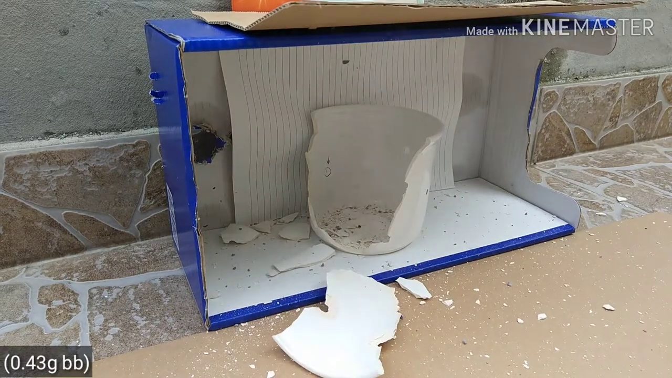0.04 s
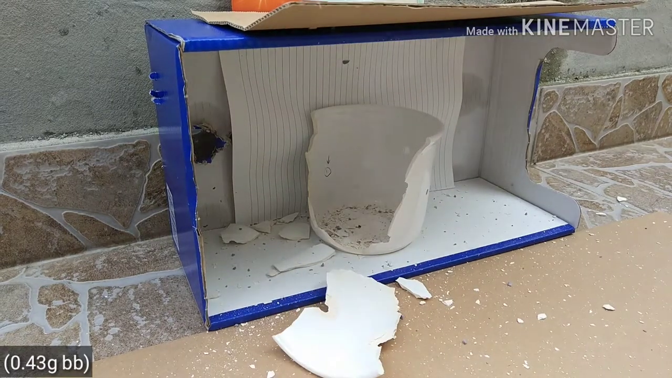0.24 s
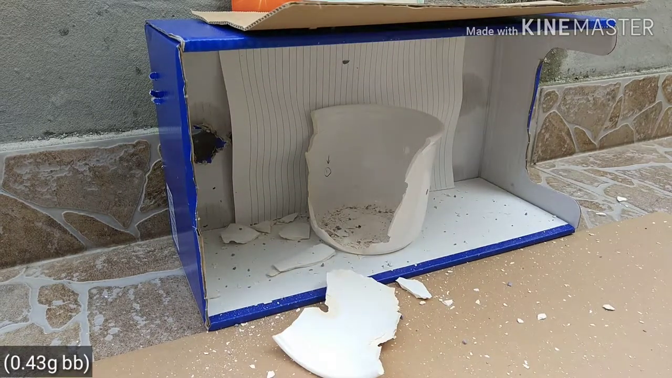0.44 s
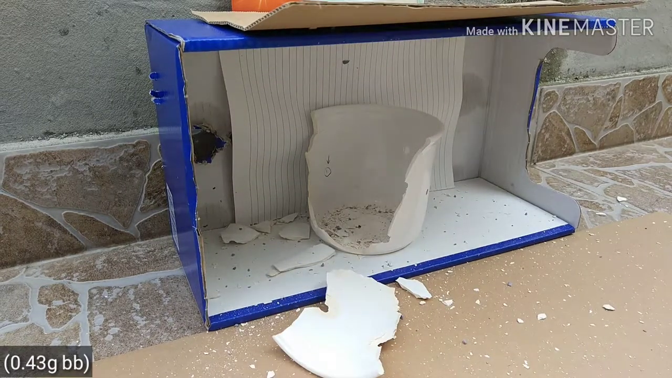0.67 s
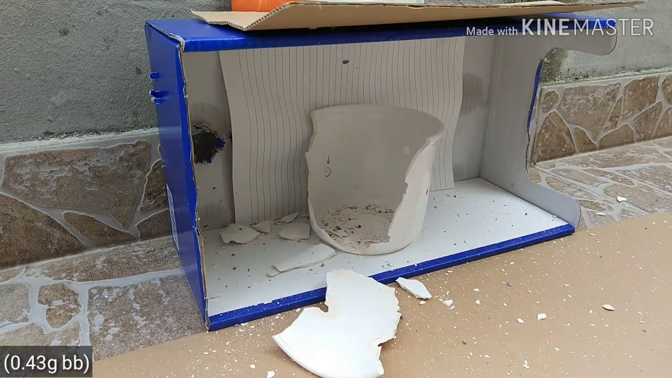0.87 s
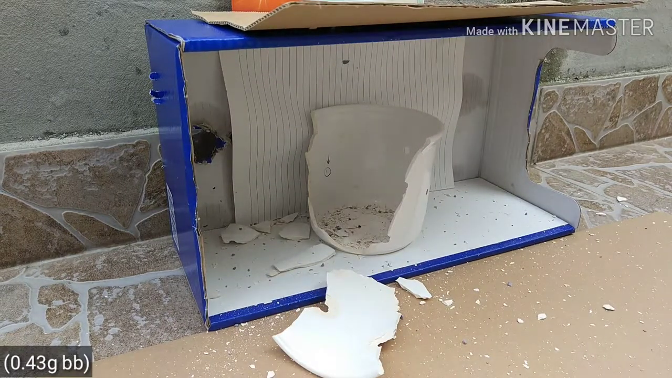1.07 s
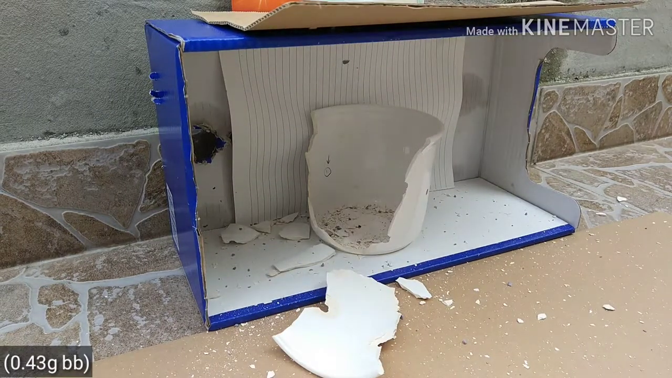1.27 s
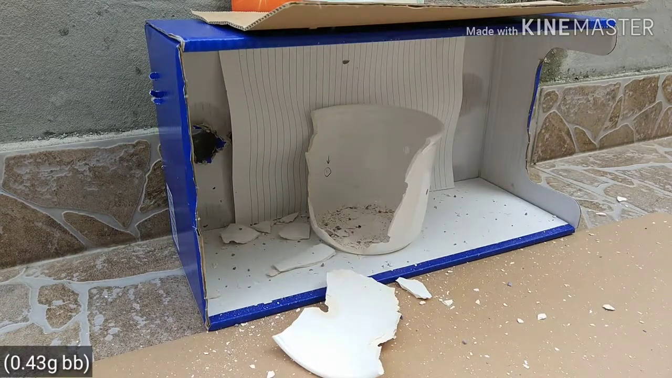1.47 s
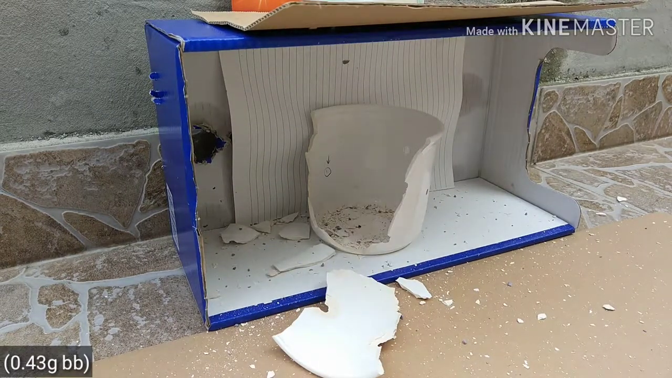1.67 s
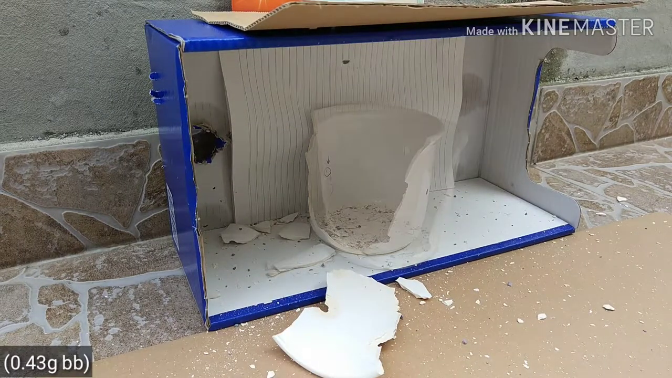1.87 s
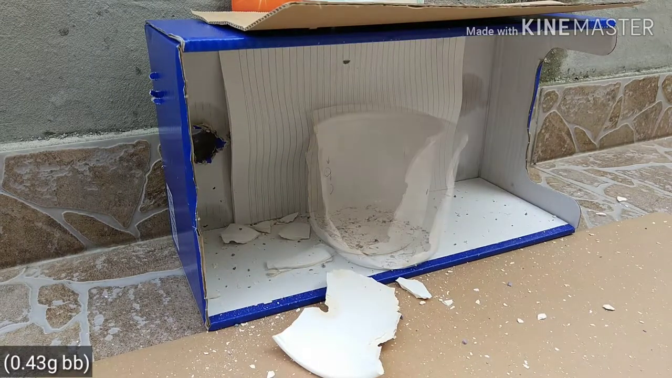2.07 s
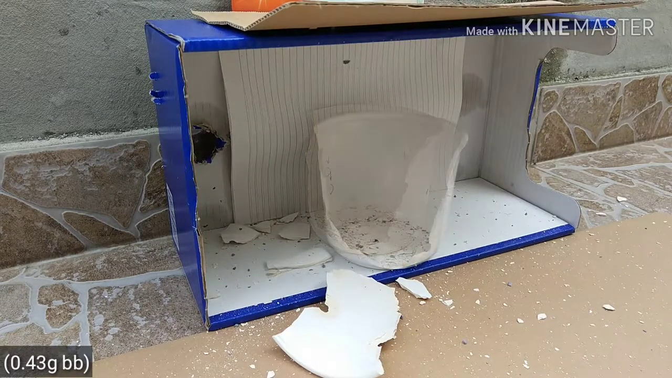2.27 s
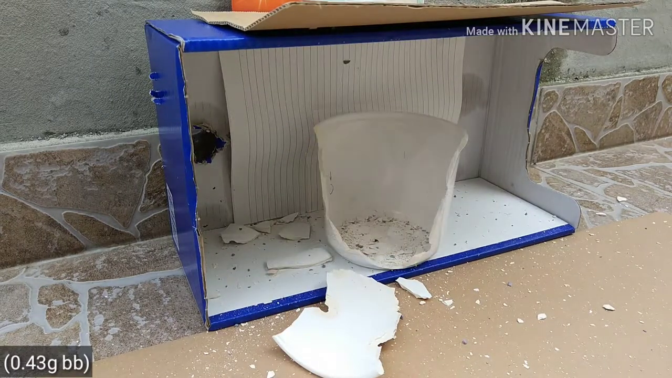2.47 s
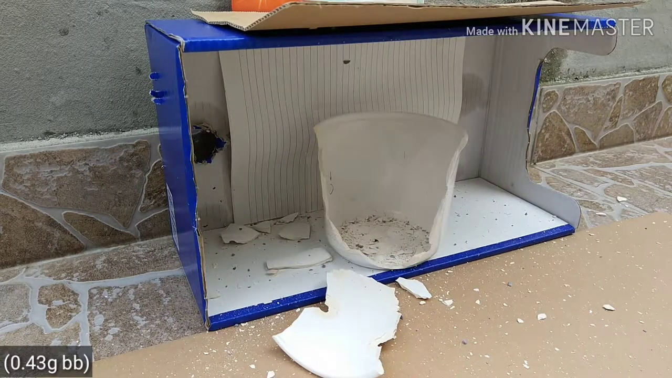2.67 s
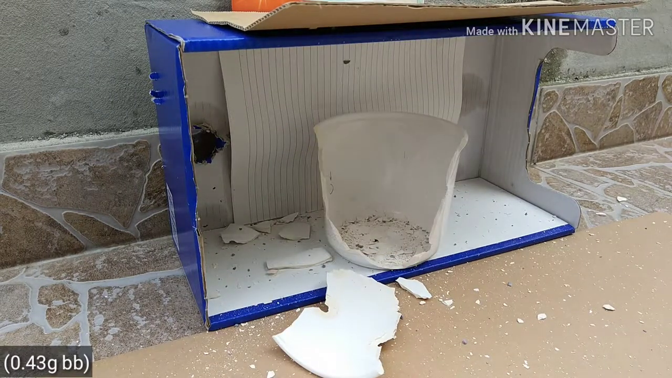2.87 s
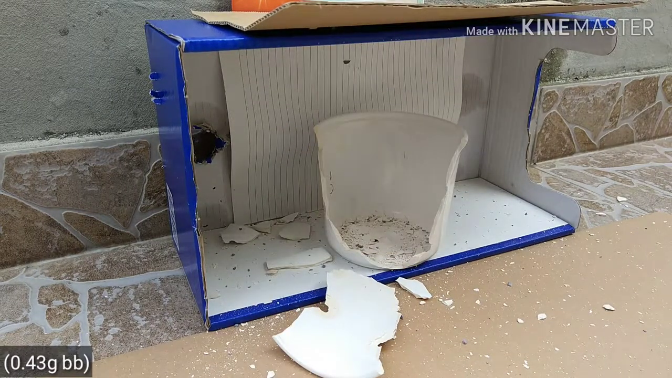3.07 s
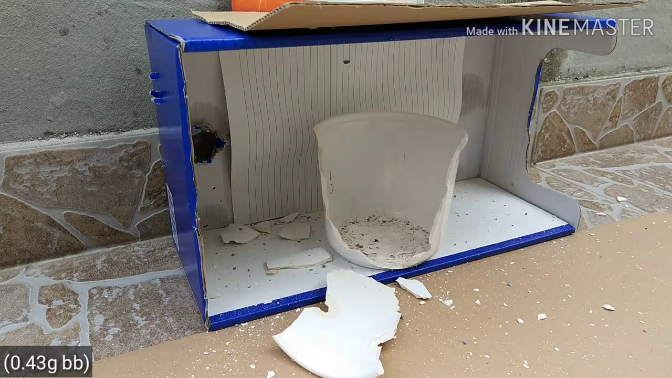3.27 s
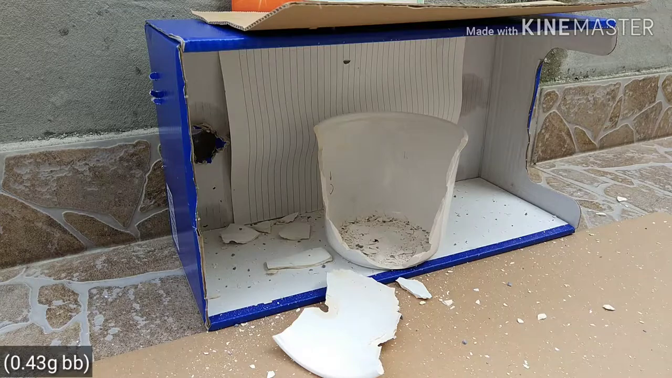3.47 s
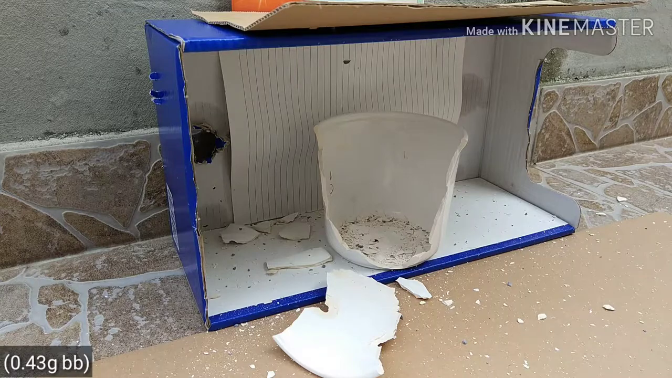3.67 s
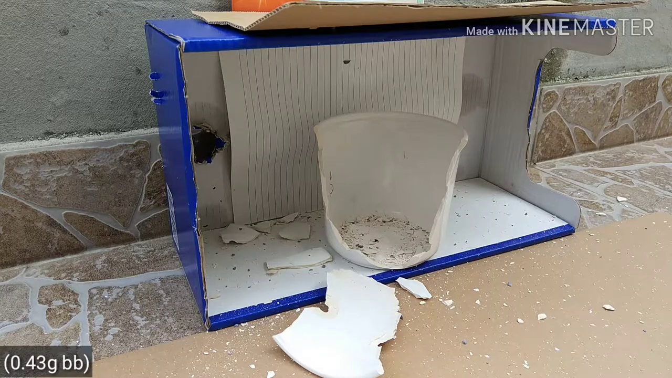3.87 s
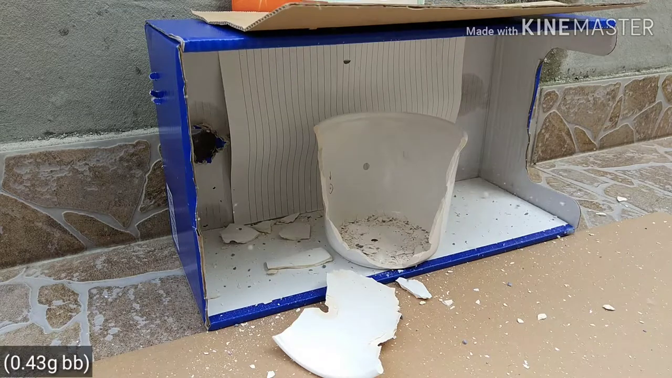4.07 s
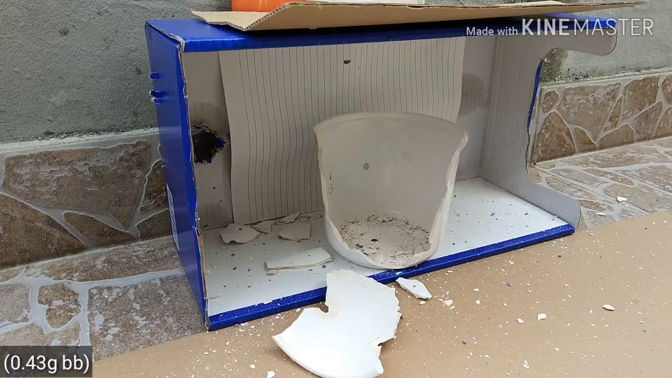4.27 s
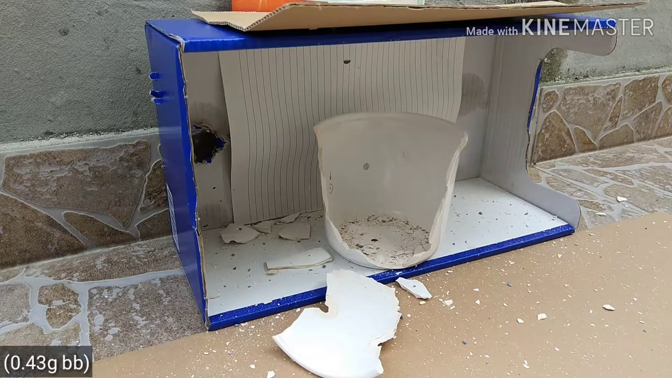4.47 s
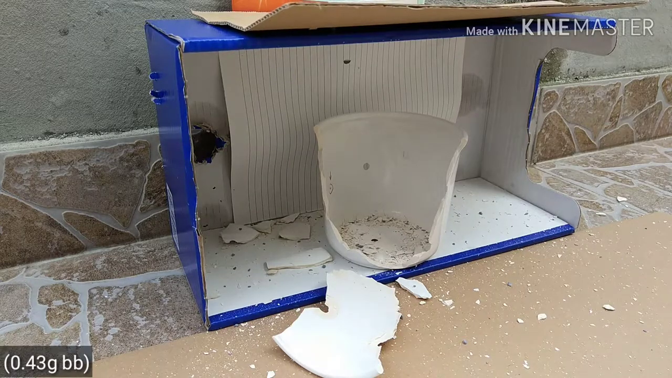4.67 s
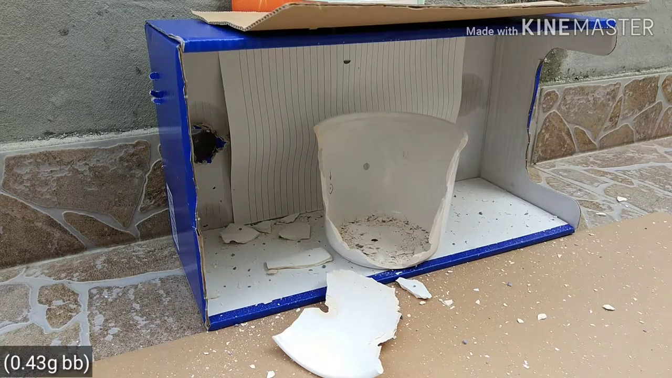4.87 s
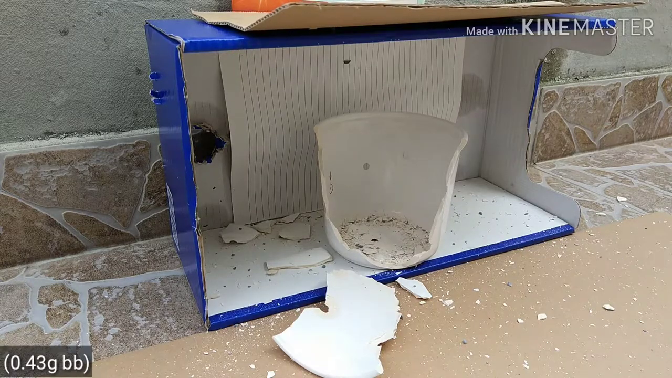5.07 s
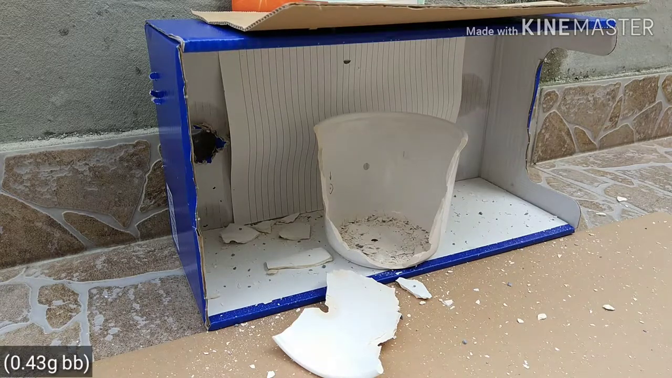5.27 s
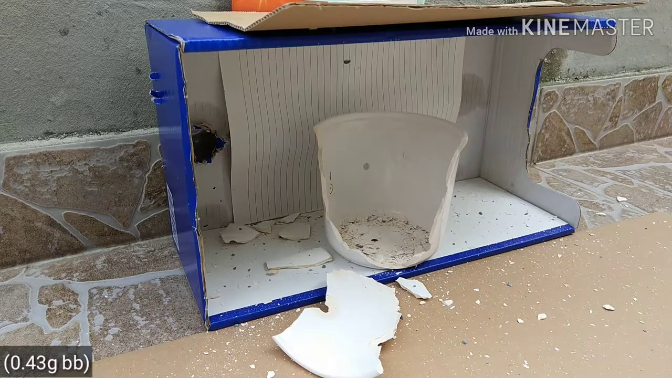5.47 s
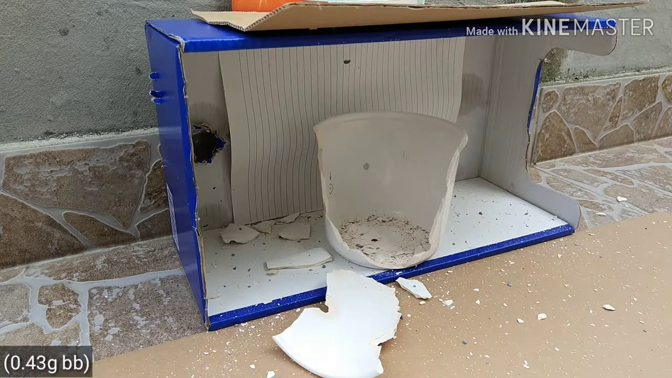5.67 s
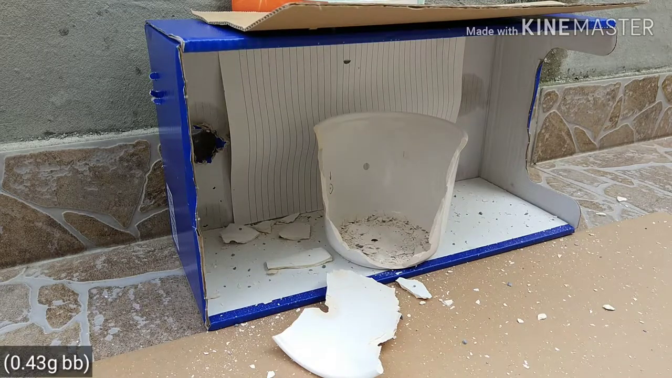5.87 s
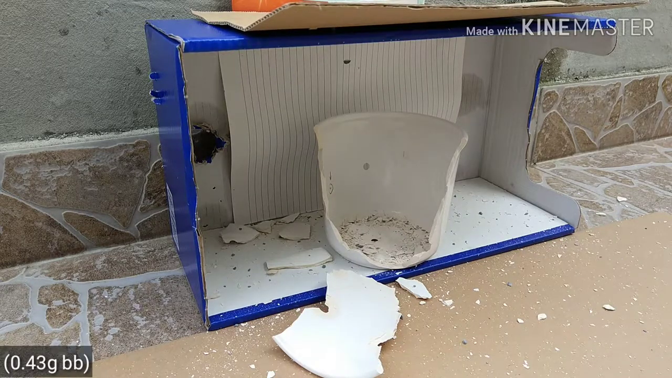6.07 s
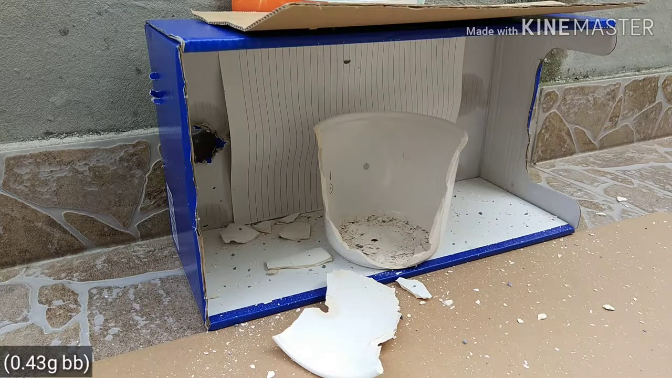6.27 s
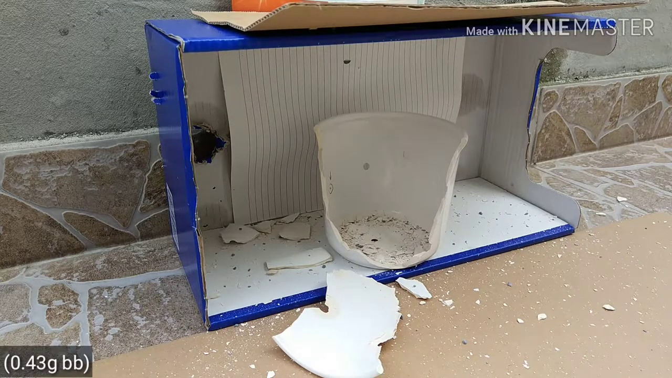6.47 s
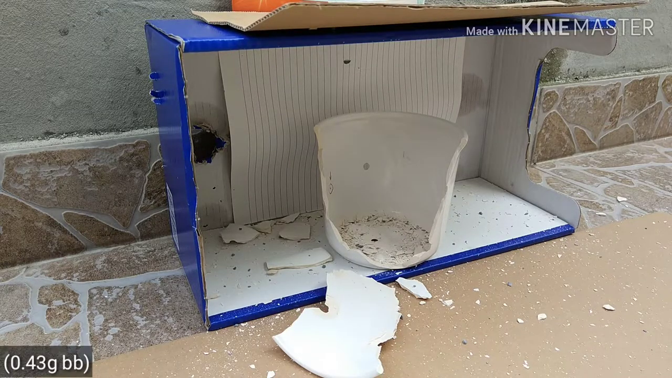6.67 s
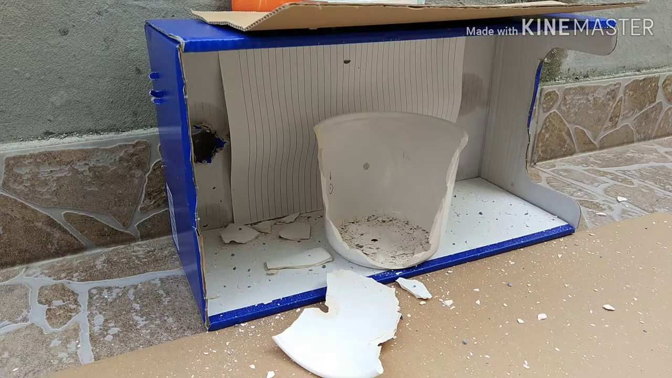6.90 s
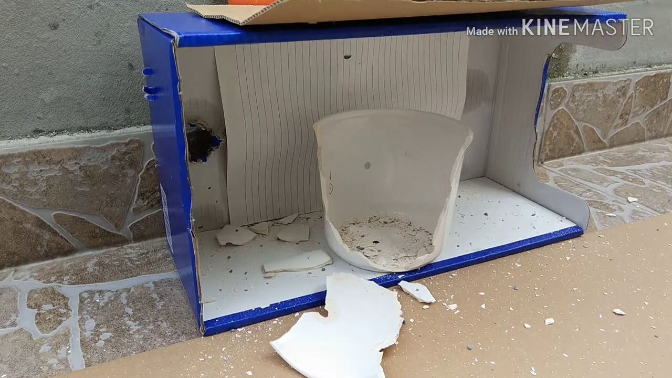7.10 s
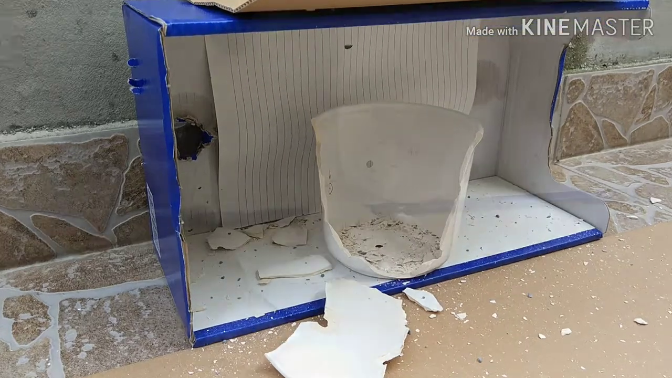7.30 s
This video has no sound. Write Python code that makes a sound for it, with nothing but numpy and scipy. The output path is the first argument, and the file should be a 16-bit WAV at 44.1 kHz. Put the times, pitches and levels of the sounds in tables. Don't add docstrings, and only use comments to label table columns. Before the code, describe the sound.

A quiet tiled yard, heard by a stereo phone close to a rifle. Far traffic murmurs slightly to the right and leaves hiss faintly. A crisp bright click lands near the left at 0.1 s with a light cloth brush; two more follow at 1.1 and 1.25 s. Around 2 s a heavy engine rumbles in far away, idling unevenly, with tiny ticks at 2.2 s. At 3.94 s a pellet hits the ceramic pot: a very loud, dense crack and hollow box boom lasting about 40 ms, with diffuse yard echo. The left channel chokes and recovers while chips tick and ring and gritty dust showers until about 4.6 s, strongest clinks at 4.3 and 4.5 s. Breeze returns and a faint fan whines from 4.4 s. A sleeve slides at 4.7-4.95 s. Sharp clicks come at 5.1 and 6.0 s, a weaker one at 5.35 s, then soft cloth touches and faint traffic until 7.3 s.

```python
import sys
import numpy as np
from scipy import signal
from scipy.fft import rfft, irfft, next_fast_len
from scipy.io import wavfile
from scipy.ndimage import uniform_filter1d, map_coordinates

SR = 44100
rng = np.random.default_rng(int(sys.argv[2]) if len(sys.argv) > 2 else 0)


def invert_db(x):
    u = np.asarray(x, float) / 20
    return 10 ** u


def file_out(sig):
    cols = np.atleast_2d(sig).T
    lim = np.clip(cols, -1, 1)
    pcm = np.round(lim * 32767).astype(np.int16)
    wavfile.write(sys.argv[1], SR, pcm)


N = 323694

# [Hz, dB per Hz]
RUMBLE_SPECTRUM = [(15, -66.5), (25, -34.5), (37, -54), (134, -13), (168, -10.5), (204, 0), (241, -7.5),
                   (284, -2.5), (395, -12), (458, -12), (900, -21.5), (1170, -36.5), (1980, -120)]
# [Hz, dB per Hz]
TYRE_SPECTRUM = [(150, -40), (400, -6), (610, -0.5), (800, -5.5), (1050, -4), (1500, -8), (3000, -15),
                 (8000, -23.5), (16000, -32.5)]
# [Hz, -1 to 1]
PORT_LIKENESS = [(60, 0.91), (130, 0.55), (290, 0.83), (640, 0.24), (1410, -0.36), (3100, -0.01),
                 (6820, -0.058), (15000, 0.12)]
# [Hz, Hz, dB]
IDLE_ORDERS = [(207, 5.2, 4), (277, 14, -5)]
# [Hz, dB per Hz]
SNAP_SPECTRUM = [(530, -71), (900, -36), (1470, -35.5), (3040, -36.5), (4100, -35), (6180, -22),
                 (6970, -20), (9200, -9.5), (9880, -10), (12300, -1), (14200, -11), (16000, -27.5)]
# [Hz, dB per Hz]
BUMP_SPECTRUM = [(120, -24), (300, 5.5), (700, 7.5), (1400, -3), (2500, -8), (6000, -55)]
# [Hz, dB]
LEFT_PORT = [(100, 1.5), (5000, -2), (8000, 2.5), (10500, 10), (12300, 15.5), (14000, 12), (16000, 10)]
# [s, dB, dB, dB, s]
CRACK_PARTS = [
    (3.939, -36, -33.5, -42, .1),
    (3.9414, -4.5, -12, -25, 0.094),
    (3.9486, -7, -6, -2, 0.047),
    (3.9515, -9, -3, -5, 0.011),
    (3.9560, -3, -11, -1, 0.021),
    (3.958, -0.5, -6.5, -2, 0.025),
    (3.9640, -6.5, -9, -4, 0.016),
    (3.9700, -20.5, -12, -13, 0.076),
    (3.9754, -10.5, -24.5, -11.5, 0.054),
]
# [Hz, dB per Hz]
CERAMIC_SPECTRUM = [(500, -16), (1200, -4), (3000, 4.5), (6000, 2), (10000, -1.5), (16000, -7)]
# [Hz, dB per Hz]
CRATE_SPECTRUM = [(40, -50), (110, -18.5), (220, 1.5), (500, -5.5), (1000, -6), (1800, -9.5), (4000, -39.5)]
# [Hz, s]
YARD_DECAY = [(100, 0.47), (300, 0.67), (1500, .9), (5000, 1), (9000, 0.93), (14000, 0.46)]
# [Hz, dB per Hz]
GRIT_SPECTRUM = [(1200, -29), (2500, -10), (5000, -3.5), (8000, -13), (12000, -6.5), (16000, -10)]
# [s, dB, dB, dB, Hz]
CHIP_LANDINGS = [(2.165, -46, -1, -12, 3440), (2.19, -51, -1, -12, 3600), (4.0754, -23, -1.5, -3, 1300),
                 (4.0863, -21.5, 5, -6, 2680), (4.1314, -25.5, 8.5, -15, 3970),
                 (4.1603, -22.5, 2, -3.5, 4430), (4.174, -16, 9, -17.5, 2790), (4.1954, -24, 6, -9, 4420),
                 (4.2366, -19.5, 2, 2, 2451), (4.2563, -20.5, 9, -20, 3300), (4.296, -11, 4, -30, 2730),
                 (4.362, -29.5, 19, -15.5, 3500), (4.4893, -24, 14, -21, 4560),
                 (4.4997, -7.5, 8, -21, 3520), (4.5006, -25, 0, -3.5, 6440), (4.5156, -33, 2, -17, 3400)]
# [s, dB]
CLOTH_BRUSHES = [(0.156, -43), (0.38, -48), (0.903, -48), (2.111, -48), (5.646, -48), (5.8794, -57),
                 (6.0551, -49.5), (6.448, -52.5), (6.8494, -52.5)]
# [s, dB, dB, s]
SOFT_THUDS = [(0.162, -48.5, 0, 0.1), (4.034, -39, -6, 0.05), (4.077, -37, -14, 0.059),
              (4.173, -34.5, -2, 0.018), (4.211, -33.5, -2, 0.038), (4.238, -34, -3, 0.03)]
# [Hz, dB per Hz]
CLOTH_SPECTRUM = [(1200, -26), (2500, -8), (5500, 3), (8000, -6), (12000, -4.5), (16000, -7)]
# [Hz, dB per Hz]
LEAF_SPECTRUM = [(1200, -32), (2500, -4), (5000, -1.5), (8000, -7.5), (12000, -7.5), (16000, -18)]
# [Hz, dB]
PHONE_BAND = [(100, 1), (15000, 1), (15600, -5.5), (16200, -22), (17000, -36)]
# [Hz, dB]
BODY_SHADE = [(3000, -3.5), (6000, -3), (9000, -18), (16000, -16.5)]
# [s, dB]
ROAD_FLOW = [(0, -68), (1.2, -67), (1.7, -68), (2.2, -73), (2.88, -69), (3.3, -66), (3.9, -65), (4.7, -66),
             (6.0, -67.5), (6.8, -68), (7.34, -71)]
# [s, dB]
LEAF_BREEZE = [(0, -60), (1.3, -63.5), (1.7, -64.5), (2.0, -70), (2.5, -91), (3.7, -88.5), (4.4, -62.5),
               (5.0, -66.5), (6.1, -67), (7.1, -69.5), (7.34, -79.5)]
# [s, dB, s]
IDLE_SURGES = [(2.47, -86, 0.22), (2.88, -89, 0.088), (3.27, -82.5, 0.29), (3.75, -81, 0.15),
               (4.324, -84, 0.096), (4.9, -85, 0.13), (5.3, -83.5, 0.21), (5.9, -88, 0.29),
               (6.7, -93.5, 0.37)]
# [s, dB, dB, Hz, dB]
BOLT_CLICKS = [(0.0935, -8, -26, 2820, -16.5), (1.2371, -14, -30, 2170, -37),
               (2.2167, -33.5, -32, 3070, -24), (2.2492, -28, -28, 2770, -19),
               (5.1136, -10, -34.5, 2810, -23.5), (5.9772, -10, -28, 3250, -32.5)]
# [s, dB, dB, Hz, dB]
CATCH_CLICKS = [(1.1189, -11, -38, 1575, -25.5), (5.3385, -35.5, -27, 1473, -25)]
# [s, s, s, dB]
LIMITER_CHOKES = [
    (3.95, .001, .001, 13.5),
    (3.974, .025, .016, 28),
    (4.038, .006, .018, 28),
]
# [s, dB, dB]
SPECK_BOUNCES = [(2.2272, -37, 10), (4.2103, -27, 24), (4.2196, -25.5, 13), (4.2702, -15, 10),
                 (4.335, -27, 13), (4.3805, -15.5, 21), (4.412, -20, 20), (4.4618, -21, 18),
                 (4.4777, -29, 22), (4.502, -29, 19), (4.5667, -50, 7.5), (4.595, -38, 11),
                 (4.633, -41, 11.5), (4.647, -33.5, 12.5)]


def unit(x):
    return x / np.sqrt(np.mean(x ** 2) + 1e-20)


def since(s):
    return np.maximum(np.arange(N) / SR - s, 0)


def along(points, hz):
    f, v = np.transpose(points)
    return np.interp(np.log(hz + 1), np.log(f + 1), v)


def curve(points):
    s, value = np.transpose(points)
    return np.interp(np.arange(N) / SR, s, value)


def wobble(rate, size=32):
    at = np.arange(0, N + size, size)
    knots = rng.standard_normal(int(N * rate / SR) + 4)
    return np.interp(np.arange(N), at, map_coordinates(knots, [at * rate / SR]))


def filtered(x, response):
    m = next_fast_len(N + SR // 2)
    return irfft(rfft(x, m) * response(np.fft.rfftfreq(m, 1 / SR)), m)[..., :N]


def coloured(x, spectrum, keep_power=True):
    cepstrum = irfft(np.log(invert_db(along(spectrum, np.fft.rfftfreq(2048, 1 / SR))) + 1e-6))
    cepstrum[1:1024] *= 2
    cepstrum[1025:] = 0
    kernel = irfft(np.exp(rfft(cepstrum)))
    if keep_power:
        kernel = kernel / np.linalg.norm(kernel)
    return signal.oaconvolve(np.atleast_2d(x)[:, :N], kernel[None], axes=1)[:, :N]


def rush(gain, patchy_db):
    z = signal.stft(rng.standard_normal((2, N + 512)), nperseg=512)[2]
    patches = uniform_filter1d(rng.standard_normal(z.shape[1:]), 6, 0)
    patches = unit(uniform_filter1d(patches, 14, 1))
    pair = signal.istft(z * invert_db(patchy_db * patches), nperseg=512)[1][:, :N]

    def mid_side_gain(hz):
        turn = np.arccos(np.clip(along(PORT_LIKENESS, hz), -1, 1)) / 2
        return gain(hz) * [np.cos(turn), np.sin(turn)]

    mid, side = filtered(pair, mid_side_gain)
    return unit(np.array([mid + side, mid - side]))


def dying(t, t60, rise):
    return invert_db(-60 * t / np.clip(t60, .003, .3)) * (1 - np.exp(-t / rise))


def add(bus, s, shape, likeness):
    a, b = rng.standard_normal((2, shape.shape[-1]))
    likeness = np.clip(likeness, 0, 1)
    burst = shape * np.array([a, likeness * a + np.sqrt(1 - likeness ** 2) * b])
    burst *= np.linalg.norm(shape, axis=-1, keepdims=True) / np.linalg.norm(burst, axis=-1, keepdims=True)
    bus[:, round(s * SR):][:, :len(a)] += burst


def add_ring(bus, s, db, hz, t60, spread, count=9):
    t = np.arange(SR // 8) / SR
    off = np.linspace(-2, 2, count)[:, None] + .2 * rng.standard_normal((count, 1))
    phase = rng.uniform(0, 2 * np.pi, (2, count, 1))
    strength = invert_db(rng.normal(0, 3.7, (count, 1)) - 3.7 * np.abs(off))
    life = dying(t, t60 / (1 + 0.5 * np.abs(off)), 0.00036)
    scatter = 3.5 * uniform_filter1d(rng.standard_normal((count, len(t))), size=40)
    life = life + invert_db(-12.5) * scatter * dying(t, 4.3 * t60, 0.0031)
    ring = strength * life * np.sin(2 * np.pi * hz * np.exp(spread * off) * t + phase)
    bus[:, round(s * SR):][:, :len(t)] += invert_db(db) * ring.sum(axis=1)


def snap_colour(x):
    left, right = coloured(x, [(hz, db - along(LEFT_PORT, hz)) for hz, db in SNAP_SPECTRUM])
    return np.array([left, coloured(right, BODY_SHADE, keep_power=False)[0]])


def traffic(deepening):
    flow_db = curve(ROAD_FLOW)
    deeper_db = 8.5 * deepening - 1.0 * since(1.95)
    rumble = rush(lambda hz: invert_db(along(RUMBLE_SPECTRUM, hz)), patchy_db=2.0)
    rumble *= invert_db(flow_db + 1.24 + deeper_db)
    wash = rush(lambda hz: invert_db(along(TYRE_SPECTRUM, hz)), patchy_db=1.1)
    wash *= invert_db(flow_db + 3.0 + 0.88 * wobble(1.8))
    return invert_db([[-.7], [.7]]) * (rumble + wash)


def idling_engine(deepening):
    idle_hz, rest_db = 66.5, -106
    t = np.arange(N) / SR
    swell = invert_db(rest_db) + sum(invert_db(db) * np.exp(-((t - s) / half) ** 2) for s, db, half in IDLE_SURGES)

    def orders(f):
        return sum(invert_db(db) / (1 + ((f - hz) / width) ** 2) for hz, width, db in IDLE_ORDERS)

    rough = invert_db(11.5) * np.sqrt(swell * invert_db(-82)) * rush(orders, patchy_db=0.3) * deepening
    tone = swell * invert_db(1.5) * np.sin(2 * np.pi * idle_hz * t + .4 * wobble(4))
    return rough + tone


def fan():
    start_s, spin_up_s, level_db, whine_hz = 4.4, .2, -72, 615
    level = invert_db(level_db + 1.5 * wobble(8)) * (1 - np.exp(-since(start_s) / spin_up_s))
    return level * np.sin(2 * np.pi * whine_hz * np.arange(N) / SR + 1.1 * wobble(12))


def leaves():
    level = invert_db(curve(LEAF_BREEZE) - 6.5 + .9 * wobble(6.7))
    return level * rush(lambda hz: invert_db(along(LEAF_SPECTRUM, hz)), patchy_db=2.0)


def street():
    deepening = 1 - np.exp(-since(1.95) / 0.16)
    return traffic(deepening) + idling_engine(deepening) + fan() + leaves()


def sleeve():
    start_s, rise_s, end_s, level_db, swell_db, t60_s = 4.71, 0.017, 4.93, -56.5, 6.5, 0.29
    t = since(start_s)
    slide_db = level_db + swell_db * np.minimum(t / (end_s - start_s), 1) - 60 * since(end_s) / t60_s
    shape = invert_db(slide_db - 6.5 + 1.5 * wobble(30)) * (1 - np.exp(-(t / rise_s) ** 2))
    return shape * invert_db([[0], [-2.5]]) * coloured(rng.standard_normal((2, N)), CLOTH_SPECTRUM)


def contacts():
    snap, ring, bump = np.zeros((3, 2, N + SR))
    t = np.arange(SR // 4) / SR
    speck_hz = 3300 * np.exp(.25 * rng.standard_normal(len(SPECK_BOUNCES)))
    specks = [(*row, -24.5, hz) for row, hz in zip(SPECK_BOUNCES, speck_hz)]
    tick = dying(t, .004, 0.00018) + invert_db(-20.0) * dying(t, 0.052, 0.0023)
    for s, db, pan_db, knock_db, knock_hz in [*CHIP_LANDINGS, *specks]:
        add(snap, s, invert_db([[db - 8.5], [db - .8 - pan_db]]) * tick, likeness=0.36)
        add_ring(ring, s, db + knock_db - 2.0, .9 * knock_hz, t60=0.025, spread=0.17, count=7)
    brush_s = 0.021
    brush = np.exp(-((t - brush_s / 2) / brush_s * 3) ** 2)
    for s, db in CLOTH_BRUSHES:
        add(snap, s, invert_db([[db - 18], [db - 11]]) * brush, likeness=0)
    for s, db, pan_db, t60 in SOFT_THUDS:
        level = invert_db([[db - 3.5 + pan_db / 2], [db - 4.5 - pan_db / 2]])
        add(bump, s, level * dying(t, t60, 0.00077), likeness=0.45)
    return snap_colour(snap) + ring[:, :N] + coloured(bump, BUMP_SPECTRUM)


def clicks():
    snap, ring = np.zeros((2, 2, N + SR))
    t = np.arange(SR // 4) / SR
    rebound = np.roll(dying(t, 0.0086, 0.00031), round(0.003 * SR))
    blow = dying(t, .011, 0.00019) + invert_db(-14) * rebound
    echo = np.roll(blow, round(0.0213 * SR))
    direct = invert_db([[0], [-8]]) * (blow + invert_db(-26.5) * echo)
    tail = invert_db([[-19], [-11]]) * dying(t, 0.12, 0.0068)
    for rows, clink_hz in [(BOLT_CLICKS, 6000), (CATCH_CLICKS, 5180)]:
        for s, db, knock_db, knock_hz, clink_db in rows:
            add(snap, s, invert_db(db - 11.0) * (direct + tail), likeness=0.13)
            add_ring(ring, s, db + knock_db - 8.0, knock_hz, t60=0.058, spread=0.07)
            clink = db + clink_db + np.array([[-6], [-13]])
            add_ring(ring, s, clink, clink_hz, t60=0.052, spread=0.086)
    return snap_colour(snap) + ring[:, :N]


def grit(count=700):
    start_s, rise_s, level_db, thins_s, end_power = 3.989, .035, -33, 0.27, 3.
    when, size, side = rng.random((count, 3)).T
    specks = np.zeros((2, N))
    at = ((3.99 + 0.65 * when) * SR).astype(int)
    specks[:, at] = invert_db(np.minimum(-4.5 * np.log(size), 11)) * np.array([np.cos(side), np.sin(side)])
    decay = invert_db(-60 * np.arange(400) / SR / .004)
    specks = signal.oaconvolve(specks, decay[None], axes=1)[:, :N]
    dust = rng.standard_normal((2, N)) * (.33 + 1.3 * specks) * invert_db(2.7 * wobble(53))
    t = np.minimum(since(start_s), 2)
    shower = (1 - np.exp(-(t / rise_s) ** 2 / 2)) * invert_db(level_db - 2.7 * (t / thins_s) ** end_power)
    return shower * invert_db(-6.5) * invert_db([[0], [-9]]) * coloured(dust, GRIT_SPECTRUM)


def yard_answer(dry):
    hz, t, z = signal.stft(rng.standard_normal((2, SR)), SR, nperseg=256)
    tail = signal.istft(z * invert_db(-60 * t / along(YARD_DECAY, hz)[:, None]), SR, nperseg=256)[1]
    tail *= 1 - np.exp(-np.arange(tail.shape[1]) / SR / 0.016)
    tail *= invert_db(1.5 * wobble(60)[:tail.shape[1]])
    return signal.fftconvolve(dry, tail / np.linalg.norm(tail[0]), axes=1)[:, :N]


def shot():
    sharp, boom = np.zeros((2, 2, N + SR))
    t = np.arange(SR // 8) / SR
    for s, left_db, right_db, boom_db, t60 in CRACK_PARTS:
        blow = dying(t, max(t60, .004), .0004)
        add(sharp, s, invert_db([[left_db - 8.0], [right_db - 1.5]]) * blow, likeness=0.1)
        add(boom, s, invert_db([[boom_db - 8], [boom_db - 8]]) * blow, likeness=0.86)
    direct = coloured(sharp, CERAMIC_SPECTRUM) + coloured(boom, CRATE_SPECTRUM)
    return direct + invert_db(-14.5) * yard_answer(direct)


def scene():
    return street() + sleeve() + contacts() + clicks() + grit() + shot()


def limiter():
    release_s, creep_db, creep_s = .006, 18, .07
    loss_db, end_s = 0, 0
    for s, attack, hold, depth_db in LIMITER_CHOKES:
        end_s = s + attack + hold
        closed = np.minimum(since(s) / attack, 1 - since(end_s) / release_s)
        loss_db = loss_db + depth_db * np.clip(closed, 0, 1)
    after = since(end_s)
    return invert_db(-loss_db - creep_db * np.minimum(after / release_s, 1) * np.exp(-after / creep_s))


def low_pass(x):
    return signal.sosfilt(signal.butter(12, 16260, fs=SR, output="sos"), x)


def record(dry):
    left = coloured(dry[0], LEFT_PORT, keep_power=False)[0]
    hiss_spectrum = [(500, -12), (3000, -2.5), (16000, 0)]  # Hz, dB
    self_noise = invert_db(-69.0) * coloured(rng.standard_normal((2, N)), hiss_spectrum)
    x = (np.array([left, dry[1]]) + self_noise) * [limiter(), np.ones(N)]
    x = x / (1 + np.abs(x / .98) ** 6) ** (1 / 6)
    mix = coloured(x, PHONE_BAND, keep_power=False)
    return low_pass(mix)


dry = scene()
out = record(dry)
file_out(out)
```